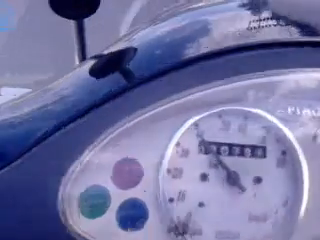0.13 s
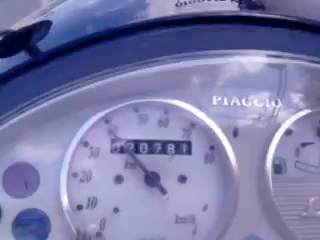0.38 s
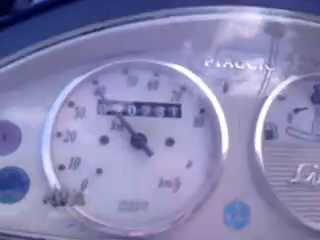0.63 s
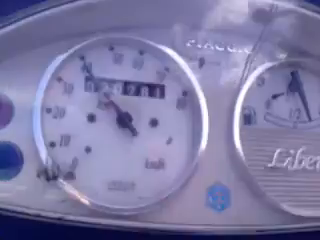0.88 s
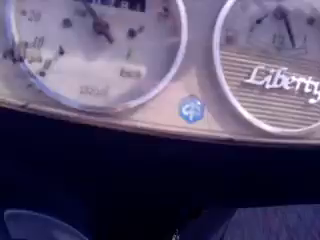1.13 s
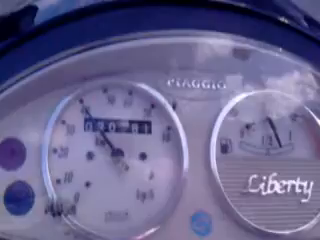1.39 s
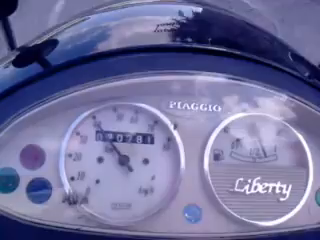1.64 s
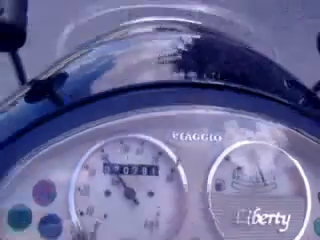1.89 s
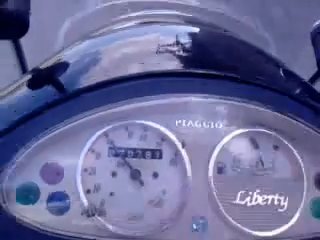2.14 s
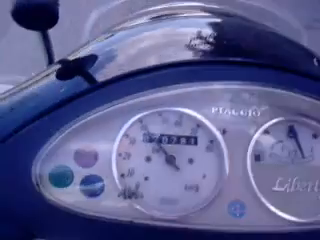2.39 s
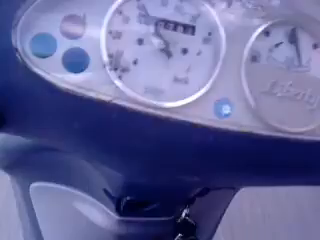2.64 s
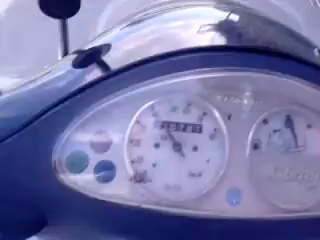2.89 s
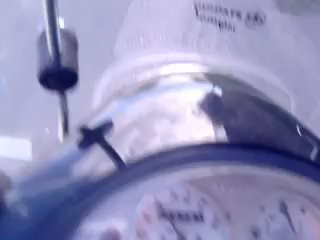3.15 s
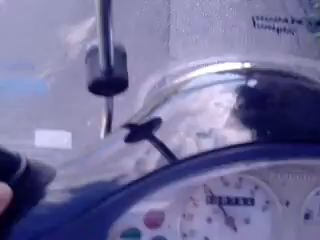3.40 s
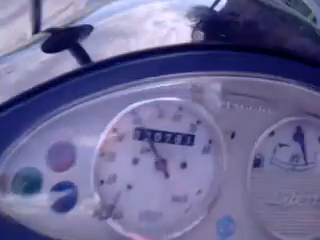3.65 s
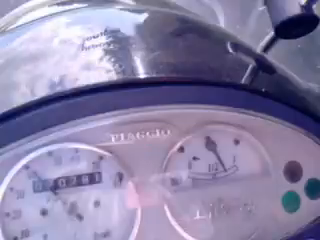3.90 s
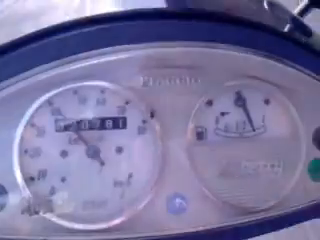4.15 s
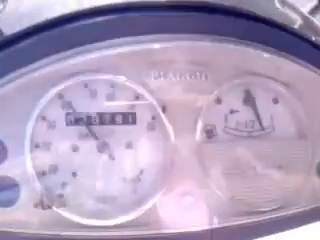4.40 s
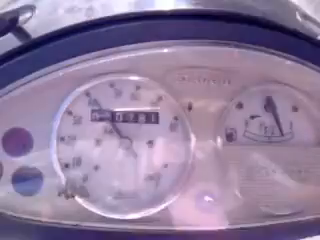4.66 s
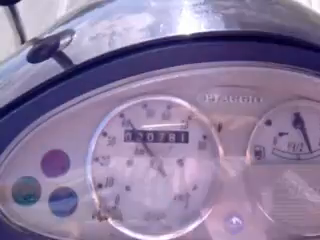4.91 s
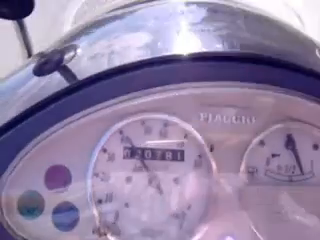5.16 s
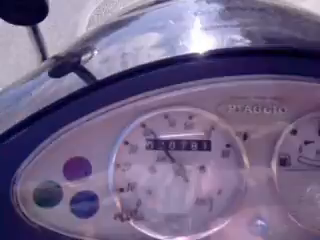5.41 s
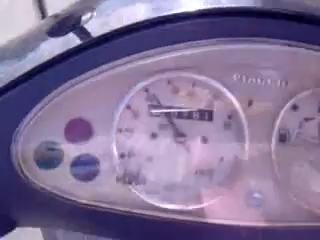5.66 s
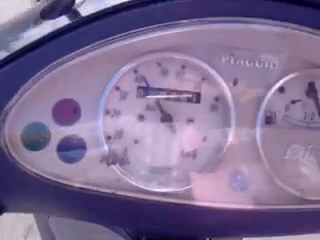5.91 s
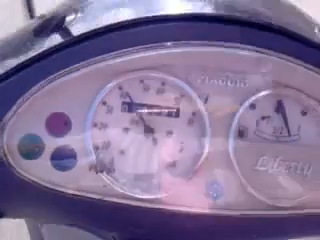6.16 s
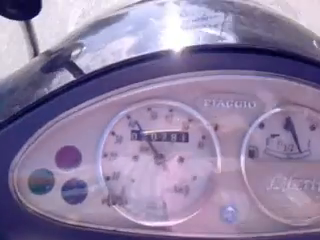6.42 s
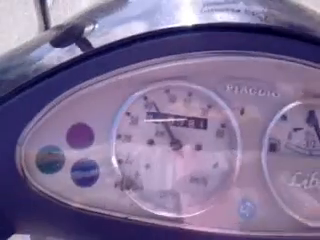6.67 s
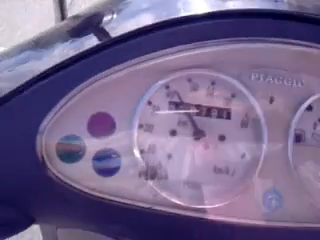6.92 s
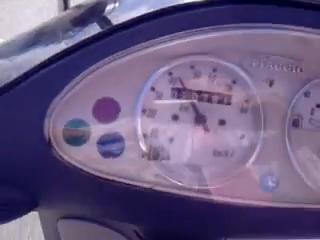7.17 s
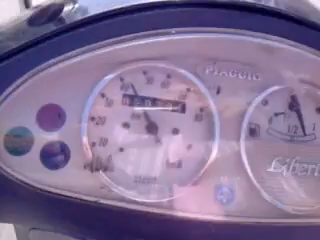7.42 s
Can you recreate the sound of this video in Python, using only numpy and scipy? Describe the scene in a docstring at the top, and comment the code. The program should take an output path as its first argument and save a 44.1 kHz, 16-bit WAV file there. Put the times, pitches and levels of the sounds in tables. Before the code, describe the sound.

Outdoors on the road, a loud scooter engine runs without pause: a hollow low drone with a torn, buzzing exhaust leak on top. Two quick bumps come early, the pitch sags and turns ragged, then rises gradually, with more bumps near the middle. The ending is smoother and slightly higher. The close, narrow-band microphone distorts, and faint wind rumbles beneath.

```python
"""A small single-cylinder four-stroke scooter under way, heard close up from the handlebar on a hand-held microphone.
Each firing booms in the broken silencer (lines at multiples of the firing rate, near its resonance) and rasps out of
the leak (cracks and noise) into the ringing body panels. The engine slows a little, firing less evenly, then recovers.
Wind (low noise) buffets the microphone and road bumps (short thumps) jolt it. A narrow-band recorder dulls the top
and overloads on the peaks."""
import sys
import numpy as np
from scipy import signal
from scipy.fft import rfft, irfft, next_fast_len
from scipy.io import wavfile
from scipy.ndimage import uniform_filter1d

SR = 44100
rng = np.random.default_rng(int(sys.argv[2]) if len(sys.argv) > 2 else 0)


def generate_wav(signal):
    """Clip the signal to [-1, 1] and save it as 16-bit WAV at the path in sys.argv[1]."""
    frames = np.transpose(np.atleast_2d(signal))
    scaled = np.clip(frames, -1, 1) * 32767
    pcm = np.round(scaled).astype(np.int16)
    wavfile.write(sys.argv[1], SR, pcm)


N = 328104


def from_db(db):
    """Decibels to amplitude gain."""
    return 10 ** (np.asarray(db) / 20)


def rms_one(x):
    """Scale to unit power."""
    return x / np.sqrt(np.mean(x ** 2) + 1e-20)


def in_time(rows):
    """Columns of a (time, ...) table as curves, one value per sample."""
    s, *columns = np.transpose(rows)
    return [np.interp(np.arange(N) / SR, s, column) for column in columns]


def colour(x, spectrum):
    """Filter a noisy signal by a (frequency [Hz], gain [dB]) curve, then scale it to unit power."""
    size = next_fast_len(N)
    hz, gain_db = np.transpose(spectrum)
    bins_hz = np.arange(size // 2 + 1) * SR / size
    gain = from_db(np.interp(np.log(bins_hz + 1), np.log(hz), gain_db))
    return rms_one(irfft(rfft(x, size) * gain, size)[:N])


def resonate(x, hz, width_hz):
    """One two-pole resonance with gain 1 on top."""
    r = np.exp(-np.pi * width_hz / SR)
    poles = [1, -2 * r * np.cos(2 * np.pi * hz / SR), r * r]
    return signal.lfilter(np.array([1, 0, -1]) * (1 - r * r) / 2, poles, x)


def drift(rate):
    """Slow chance, about rate changes a second; spread 1."""
    r = np.exp(-80 * np.pi * rate / SR)
    # drawn once every 40 samples; the first 2000 values let the filter settle
    slow = signal.lfilter([1], [1, -2 * r, r * r], rng.standard_normal(N // 40 + 2002))[2000:]
    return np.interp(np.arange(N) / 40, np.arange(len(slow)), rms_one(slow))


# engine speed: (time [s], firing rate [firings per s])
SPEED = [(0, 55.9), (.3, 55.3), (.6, 54.6), (.85, 54.2), (1.05, 53.6), (1.25, 52.0), (1.45, 51.6),
         (1.7, 51.9), (2.1, 52.5), (2.5, 53.1), (2.9, 53.9), (3.3, 54.3), (3.6, 54.2), (4.0, 55.0),
         (4.7, 55.2), (5.1, 55.4), (5.3, 56.2), (6.1, 56.4), (6.55, 56.8), (7.44, 56.9)]
# unevenness of combustion, 0 = every cycle alike: (time [s], roughness [0-1])
ROUGHNESS = [(0, .42), (.4, .52), (.7, .75), (4.5, .8), (4.7, .66), (5.15, .6), (5.3, .34), (5.7, .22),
             (7.44, .2)]


def engine():
    """Firing rate, cycles fired so far (its running sum) and roughness of the combustion."""
    per_s, = in_time(SPEED)
    rough, = in_time(ROUGHNESS)
    return per_s, np.cumsum(per_s) / SR, rough


# lines under the boom, clearest when combustion is even:
# (time [s], level at 2x firing rate [dB], level at 3x [dB])
UNDER_BOOM = [(0, -25.5, -27.5), (.35, -28, -35), (.6, -42.5, -40.5), (1.6, -39.5, -41.5), (2.1, -39, -31),
              (2.5, -40.5, -39), (5.1, -38, -40), (5.35, -32.5, -27.5), (6.3, -34, -32.5), (6.7, -31, -26),
              (7.44, -29.5, -25.5)]
# the boom passes between its lines as the hand-held microphone moves:
# (time [s], level at 4x firing rate [dB], level at 5x [dB], level at 6x [dB])
BOOM_LINES = [(0, -16, -19.5, -12.5), (.15, -18.5, -26, -13), (.4, -19, -23.5, -16), (.48, -27, -14.5, -17),
              (.65, -27.5, -14, -28), (.74, -33.5, -13.5, -17.5), (.86, -24.5, -12, -27),
              (1.001, -23, -28.5, -11), (1.1, -20, -20, -12), (1.18, -25, -14.5, -18.5),
              (1.37, -28, -12.5, -13.5), (1.46, -27.5, -19, -14), (1.6, -28, -20, -11),
              (1.72, -33.5, -25, -13), (2.02, -27, -22.5, -15), (2.14, -32, -30.5, -12.5),
              (2.28, -29, -28.5, -14), (2.39, -30, -22.5, -8.5), (2.47, -35.5, -20.5, -20),
              (2.66, -31.5, -21.5, -19.5), (2.85, -30, -14.5, -24.5), (3.03, -25, -15, -18),
              (3.21, -22.5, -30, -13.5), (3.35, -23.5, -25.5, -16), (3.42, -24, -30, -10.5),
              (3.5, -21, -25, -19), (3.94, -24, -15.5, -21), (4.2, -23, -23.5, -22),
              (4.35, -22, -16.5, -16.5), (4.48, -24.5, -29, -18), (4.62, -15.5, -36, -13),
              (4.69, -23, -15.5, -14), (4.97, -28.5, -11.5, -24.5), (5.1, -29.5, -19.5, -15),
              (5.27, -24, -19, -13), (5.38, -22, -13.5, -19.5), (5.6, -21.5, -11, -19),
              (6.15, -23, -14.5, -17), (6.551, -21.5, -12.5, -18), (7.44, -18.5, -12.5, -18.5)]
# upper flank of the boom, weaker as combustion gets uneven:
# (multiple of the firing rate [1], level when even [dB], loss at roughness 1 [dB])
FLANKS = [(7.0, -29, 5.5), (8.0, -31.5, 8)]


def boom_orders(rough):
    """Each multiple of the firing rate with its level curve in dB; roughness weakens the upper flank."""
    orders = list(zip((2, 3, 4, 5, 6), in_time(UNDER_BOOM) + in_time(BOOM_LINES)))
    for order, even_db, loss_db in FLANKS:
        orders.append((round(order), even_db - loss_db * rough))
    return orders


SILENCER_HZ, SILENCER_WIDTH_HZ = 315, 35


def boom(cycles, per_s, rough, flutter_db, wander_rad, rumble_db):
    """Low multiples of the firing rate, phased as the silencer's ring; uneven cycles shake them."""
    out, power = np.zeros(N), 0
    for order, level_db in boom_orders(rough):
        hz = order * per_s
        lag = np.arctan2(hz * SILENCER_WIDTH_HZ, SILENCER_HZ ** 2 - hz ** 2)
        # the ring steadies the lines close to it
        loose = 1 + .004 * np.abs(hz - SILENCER_HZ)
        phase = 2 * np.pi * order * cycles - lag + wander_rad * rough * loose * drift(8.7)
        gain = from_db(level_db + flutter_db * rough * drift(16.7))
        out += gain * np.sqrt(2) * np.cos(phase)
        power = power + from_db(level_db) ** 2
    # turbulent gas also rings the silencer between the lines
    rumble = rng.standard_normal(N)
    for _ in range(2):
        rumble = resonate(rumble, SILENCER_HZ, 170)
    return out + from_db(rumble_db) * rough * np.sqrt(power) * rms_one(rumble)


def echoes(clicks, decay_s, change_per_s, count=5):
    """Bodywork and road smear each click into a short patter, which changes as the microphone moves."""
    t = np.arange(round(.03 * SR)) / SR
    patters = rng.standard_normal((count, len(t))) * (t / decay_s) * np.exp(-t / decay_s)
    shares = np.array([drift(change_per_s) for _ in patters])
    shares /= np.sqrt(np.sum(shares ** 2, axis=0))
    return rms_one(sum(signal.fftconvolve(clicks * share, p)[:N] for share, p in zip(shares, patters)))


def blasts(cycles, rough, lead, puff, spread_db, jitter_s, per_turn, crisp_db):
    """Gas through the leak: a repeating crack per firing plus noise that swells through each cycle."""
    count = int(cycles[-1]) + 2
    size, late = rng.standard_normal((count, 2)).T
    shifted = cycles + lead
    whole = np.minimum(shifted.astype(int), count - 1)
    gain = uniform_filter1d(from_db(spread_db * size[whole] * np.sqrt(rough)), size=130)
    # the swell peaks at age 1 and restarts with the next cycle; rough combustion fills it in
    age = (shifted - whole) / puff
    gate = rough + (1 - rough) * age * np.exp(1 - age)
    gate *= 1 + per_turn * np.cos(4 * np.pi * shifted)   # the crank turns twice per firing
    noise = rough * rms_one(gate * rng.standard_normal(N))
    clicks = np.zeros(N)
    at = np.flatnonzero(np.diff(whole))
    shift = (jitter_s * SR * late[whole[at]] * rough[at]).astype(int)
    clicks[np.clip(at + shift, 0, N - 1)] = 1
    cracks = from_db(crisp_db) * (1 - rough) * echoes(clicks, decay_s=.0035, change_per_s=1.6)
    # the crack repeats best in its low part
    dull = signal.sosfilt(signal.butter(2, 1300, fs=SR, output="sos"), cracks)
    mix = noise + cracks + dull
    return gain * mix / np.sqrt(uniform_filter1d(mix ** 2, size=6000))   # level evened before the gain


# stretches in which each panel, in the order of PANELS, faces the moving microphone:
# (start time [s], end time [s], relative level [dB])
PANEL_HEARD = [
    [(0, 1.64, -25.5), (5.4, 6.0, -27.5), (6.15, 7.44, -26)],
    [(.1, .32, -20.5), (.45, .85, -18.5), (1.15, 1.3, -16), (4.5, 5.5, -27), (6.0, 6.2, -22.5),
     (6.7, 7.0, -24)],
    [(1.68, 2.8, -23.5), (2.88, 3.4, -17.5), (3.55, 4.6, -17.5), (5.3, 5.45, -24), (5.9, 6.0, -31),
     (6.86, 6.95, -30)],
    [(.25, .7, -20.5), (3.9, 5.1, -25), (5.4, 6.3, -24.5), (7.1, 7.3, -18.5)],
    [(2.55, 2.98, -25.5), (3.95, 4.55, -22.5), (4.95, 5.1, -27.5), (5.75, 5.9, -17.5), (6.0, 6.08, -23),
     (6.27, 6.4, -23)],
    [(.44, .54, -28), (5.77, 5.97, -28), (6.17, 6.24, -22), (6.55, 6.8, -23.5)],
]
PANEL_HIDDEN_DB, PANEL_TURN_DB_PER_S, PANEL_FLICKER_DB = -39, 112, 2   # levels as in PANEL_HEARD


def panel_db(stretches):
    """A panel is heard while it faces the microphone and fades at a set rate as it turns away."""
    t, level_db = np.arange(0, N, 100) / SR, PANEL_HIDDEN_DB
    for start, end, top_db in stretches:
        outside_s = np.maximum(0, np.maximum(start - t, t - end))
        level_db = np.maximum(level_db, top_db - PANEL_TURN_DB_PER_S * outside_s)
    return np.interp(np.arange(N) / SR, t, level_db) + PANEL_FLICKER_DB * drift(7.0)


# leak heard at the microphone: (time [s], relative rasp level [dB], relative level of the rasp's top [dB])
LEAK = [(0, -15.5, -25), (.28, -16, -23), (.5, -16.5, -22), (.8, -19, -25.5), (1.45, -20, -27),
        (1.7, -21, -32.5), (2.2, -20, -30.5), (2.9, -22.5, -29.5), (3.2, -19.5, -32), (3.7, -22.5, -31),
        (3.85, -20, -26), (4.45, -19, -26), (4.85, -20.5, -26), (5.1, -18.5, -23.5), (5.25, -19.5, -24.5),
        (5.5, -19.5, -24), (6.0, -17.5, -18.5), (6.3, -20.5, -22.5), (6.9, -18, -24.5), (7.44, -18.5, -26)]
# filter for the broad rasp: (frequency [Hz], relative gain [dB])
RASP = [(250, -17.5), (380, -8), (460, -3.5), (730, -6), (1060, -5.5), (1400, -1), (2030, -9),
        (2700, -42.5), (3400, -54.5)]
# filter for the top of the rasp: (frequency [Hz], relative gain [dB])
RASP_TOP = [(1500, -24.5), (2200, 1), (2600, -3), (3250, -5), (3600, -11.5), (3950, -22), (4300, -31.5),
            (4650, -55.5)]
# ringing body panels: (resonance [Hz], width of one resonator pass [Hz])
PANELS = [(900, 290), (1150, 190), (1440, 110), (1780, 270), (1990, 170), (2500, 420)]
LEAK_FLICKER_DB = 1.5


def leak(gas, rough, panel_share_db, shake_s):
    """Broad rasp, its top with a level of its own, and the panels that it sets ringing."""
    rasp_db, top_db = in_time(LEAK)
    gust_db = LEAK_FLICKER_DB * drift(8.4)
    out = from_db(rasp_db - 3 + gust_db) * colour(gas, RASP)
    out += from_db(top_db - 2.5 + gust_db) * colour(gas, RASP_TOP)
    for (hz, width_hz), stretches in zip(PANELS, PANEL_HEARD):
        level_db = panel_db(stretches)
        ring = rms_one(resonate(resonate(gas, hz, width_hz), hz, width_hz))
        # the shaking path to the microphone makes each ring waver in pitch
        heard_at = np.arange(N) + shake_s * SR * rough ** 2 * drift(3.94)
        out += from_db(level_db + panel_share_db) * np.interp(heard_at, np.arange(N), ring)
    return out


# wind on the microphone: (time [s], relative level [dB])
WIND = [(0, -37.5), (.75, -36.5), (1.45, -42), (2.7, -42.5), (2.96, -42), (3.4, -43), (3.8, -42),
        (5.2, -37.5), (6.0, -46), (7.44, -43.5)]
# filter for the wind noise: (frequency [Hz], relative gain [dB])
WIND_COLOUR = [(20, -23.5), (35, -19), (55, 2), (100, 2), (200, 9), (400, -9.5), (700, -27.5)]


def wind(lumpy_db):
    """Lumpy low noise, as air buffets the microphone port."""
    level_db, = in_time(WIND)
    return from_db(level_db + 10 + lumpy_db * drift(17.0)) * colour(rng.standard_normal(N), WIND_COLOUR)


# road bumps jolting the microphone: (time [s], level of the noise at its peak [dB])
JOLTS = [(.13, -16), (.24, -16.5), (3.491, -12.5), (3.76, -18.5), (4.06, -23)]


def jolts(decay_s):
    """Short dull thumps: low noise that swells and dies exponentially around each bump."""
    envelope, t = np.zeros(N), np.arange(N) / SR
    band = signal.butter(2, [110, 600], "band", fs=SR, output="sos")
    noise = rms_one(signal.sosfilt(band, rng.standard_normal(N)))
    for s, level_db in JOLTS:
        envelope += from_db(level_db) * np.exp(-np.abs(t - s) / decay_s)
    return envelope * noise


def scene():
    """Boom, rasp, wind and jolts at one microphone."""
    per_s, cycles, rough = engine()
    low = boom(cycles, per_s, rough, flutter_db=2.6, wander_rad=0.71, rumble_db=-8)
    # lead and puff in cycles; spread and jitter as at roughness 1
    gas = blasts(cycles, rough, lead=.3, puff=0.99, spread_db=1.5, jitter_s=0.00018, per_turn=0.19,
                 crisp_db=-7.5)
    gas *= from_db(1.2 * rms_one(low))   # turbulence at the leak follows the booming pressure
    rasp = leak(gas, rough, panel_share_db=-7, shake_s=0.00031)
    return (low + rasp + wind(lumpy_db=4.0) + jolts(decay_s=.018))[None]


OVERLOAD = .713   # amplitude at which peaks flatten
BAND_HZ, CUTOFF_HZ = 4750, 15800


def record(dry):
    """The band ends above 4 kHz, peaks are cut flat and so spit treble, the very top is cut."""
    narrow = signal.sosfilt(signal.cheby2(14, 60, BAND_HZ, fs=SR, output="sos"), dry)
    flat = np.clip(narrow, -OVERLOAD, OVERLOAD)
    return signal.sosfilt(signal.ellip(10, .1, 60, CUTOFF_HZ, fs=SR, output="sos"), flat)


dry = scene()
out = record(dry)
generate_wav(out)
```